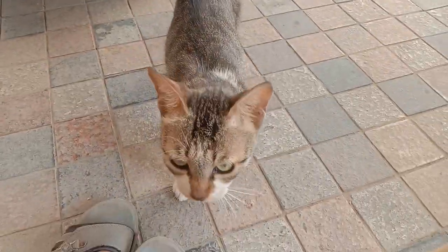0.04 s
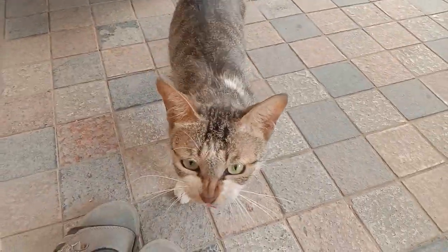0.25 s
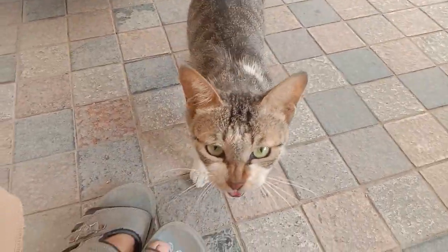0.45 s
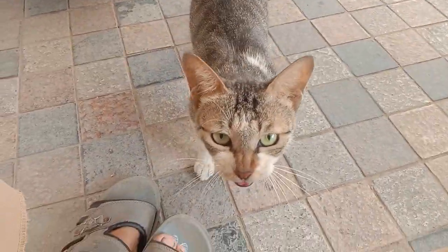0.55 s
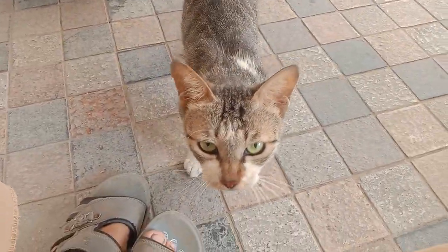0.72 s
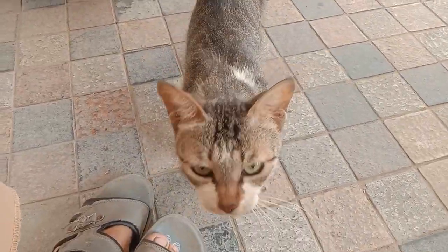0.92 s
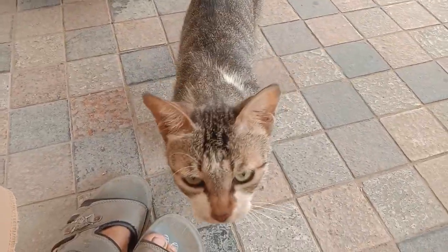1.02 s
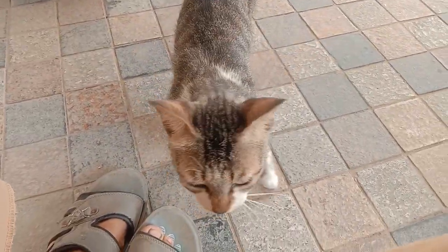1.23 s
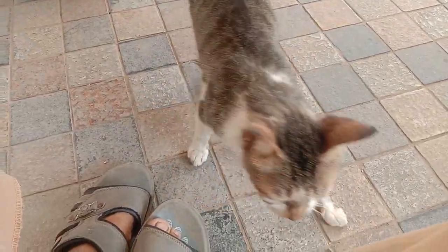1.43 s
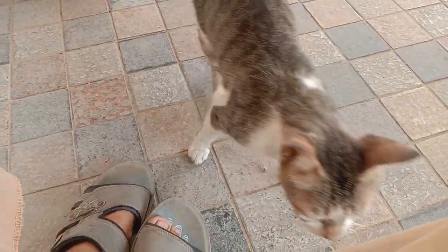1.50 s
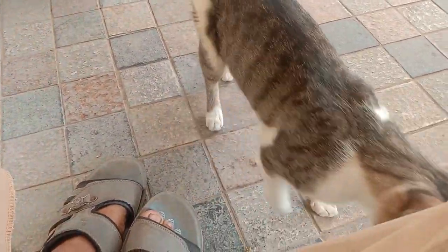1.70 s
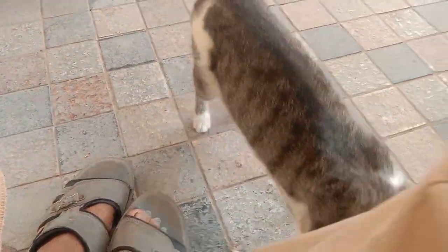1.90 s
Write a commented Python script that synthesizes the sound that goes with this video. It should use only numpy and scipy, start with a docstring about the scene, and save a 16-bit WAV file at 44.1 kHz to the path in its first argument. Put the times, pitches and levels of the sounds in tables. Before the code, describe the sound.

A cat close by gives one raspy-then-clear meow, then a door farther off creaks and bangs.

```python
"""A cat close by on a tiled courtyard gives one long meow: a raspy, period-doubled start, a clear arch,
a breathy fall. It is made of vocal fold harmonics and breath weighted by moving mouth resonances.
Then something like a door, farther off, clicks and creaks briefly (filtered noise), and bangs shut with
a rattle (noise cracks and ringing panel modes). The walls echo both by convolution with fading noise,
over a low outdoor hum of noise bands."""
import sys
import numpy as np
from scipy import signal
from scipy.fft import rfft, irfft
from scipy.io import wavfile

SR = 44100
rng = np.random.default_rng(int(sys.argv[2]) if len(sys.argv) > 2 else 0)


def store_pcm(level_fs):
    """Save levels as 16-bit WAV."""
    pcm = np.round(np.clip(level_fs, -1, 1) * 32767).astype(np.int16)
    wavfile.write(sys.argv[1], SR, np.atleast_2d(pcm).T)


N = 85995  # samples
T = np.arange(N) / SR  # time [s]
HZ = np.fft.rfftfreq(2 * N, 1 / SR)  # filter frequencies [Hz]; double length keeps the ends apart


def undb(db):
    """Amplitude of a level in dB."""
    return 10 ** (np.asarray(db) / 20)


def unit(x):
    """Scale to rms 1."""
    return x / np.sqrt(np.mean(x ** 2) + 1e-20)


def curves(table):
    """Each column of a time table, sample by sample."""
    times, *columns = np.array(table, float).T
    return [np.interp(T, times, column) for column in columns]


def gate(start, end, ramp):
    """Fade in after start, out before end [s]."""
    return np.clip(np.minimum(T - start, end - T) / ramp, 0, 1)


def shape(x, gain):
    """Filter by a gain per frequency."""
    return irfft(rfft(x, 2 * N) * gain)[:N]


def noise(colour):
    """Noise of rms 1 with a (frequency [Hz], level [dB]) spectrum, interpolated over log frequency."""
    hz, db = np.array(colour, float).T
    level_db = np.interp(np.log(HZ + 1), np.log(hz), db)
    return unit(shape(rng.standard_normal(N), undb(level_db)))


def resonance(hz, centre, half_width):
    """Gain of a resonance: 1 at its centre, one half at half_width away."""
    return 1 / (1 + ((hz - centre) / half_width) ** 2)


def wander(hz):
    """Smooth chance of rms 1, weakening above a given rate."""
    return unit(shape(rng.standard_normal(N), resonance(HZ, 0, hz)))


def turn(hz):
    """Running phase [rad] of a frequency curve."""
    return 2 * np.pi * np.cumsum(hz + np.zeros(N)) / SR


def band(hz, half_width):
    """Noise in a resonance whose centre may move."""
    phase = turn(hz)
    return wander(half_width) * np.cos(phase) + wander(half_width) * np.sin(phase)


def decay(start, t60):
    """Quick rise around the start, then an exponential fall of 60 dB per t60 [s]."""
    contact_s = 0.0048  # rise time
    age = np.maximum(T - start + contact_s / 2, 0)
    rise = np.sin(np.pi / 2 * np.minimum(age / contact_s, 1)) ** 2
    return rise * np.exp(-np.log(1000) * age / t60)


def meow(jitter_hz=260, shimmer_hz=16, breath_pulsing=0.48):
    """Vocal fold harmonics and pulsed breath in the mouth's resonances; hoarse cycles alternate."""
    # vocal fold rate: (time [s], pitch [Hz])
    fold_rate = [(.17, 345), (.2, 359.2), (.245, 405), (.285, 427), (.325, 452.6), (.355, 452.1),
                 (.42, 456.9), (.49, 460.5), (.57, 462.5), (.64, 456.5), (.7, 453.6), (.745, 426.2),
                 (.772, 407.8), (.82, 400)]
    # hoarseness: (time [s], half-pitch tones [dB], rms pitch jitter [share], breath [dB])
    rasp = [(.185, -17, 0.023, -3), (.23, -7, 0.029, -6.5), (.285, -3, .016, -9), (.32, -7, 0.013, -28),
            (.345, -24, 0.019, -11.5), (.375, -19.5, 0.0057, -22.5), (.5, -50, 0.007, -34.5),
            (.74, -48, 0.0051, -21.5), (.8, -28, 0.022, -14)]
    # the mouth opens and closes: (time [s], first, second, third, fourth resonance [Hz])
    mouth = [(.2, 1020, 1850, 3567, 5810), (.24, 1060, 1920, 3850, 5030), (.29, 1080, 1870, 3750, 5020),
             (0.337, 1120, 1880, 3820, 4800), (0.422, 1104, 1830, 3350, 4730),
             (0.491, 1077, 1780, 3830, 5220), (0.618, 1074, 1750, 3757, 5740), (.7, 1106, 1720, 3755, 5800),
             (.78, 800, 1620, 3676, 5230)]
    # strength of those resonances before the breath balance: (time [s], first, second, third, treble [dB])
    effort = [(.17, -44.5, -51.5, -63, -77), (.192, -45.5, -45.5, -39.5, -60), (.22, -36.5, -42, -39, -58),
              (.284, -33.5, -33.5, -38, -49), (.32, -33, -35, -37, -49), (.346, -30.5, -36.5, -30, -43),
              (.375, -30, -28.5, -36.5, -46), (.44, -26.5, -23.5, -35.5, -41.5),
              (.482, -26.5, -16, -37.5, -46), (.53, -26.5, -23, -37, -50), (.59, -26, -38, -36.5, -55),
              (.625, -27.5, -32.5, -37.5, -51), (.704, -28.5, -34.5, -36.5, -50),
              (.77, -32, -40, -41, -56.5), (.785, -36, -49, -42.5, -48), (.81, -51, -52, -40, -57)]
    # their half widths in the clear voice: one column [Hz]
    widths_hz = [395, 170, 366, 798]
    # how much hoarseness widens each: one column [share per unit half-pitch amplitude]
    rasp_widening = [0.79, 5.2, 2.2, 1.7]
    # faint upper resonances: (frequency [Hz], half width [Hz], level against the treble [dB])
    overtones = [(7050, 220, -14.5), (9070, 900, -31.5), (12300, 630, -37.5)]
    # fundamental before the breath balance: (time [s], level [dB])
    fundamental_level = [(.18, -55), (.33, -45.5), (.4, -48), (.47, -44), (.57, -57.5), (.68, -44),
                         (.79, -38.5), (.815, -57)]
    shimmer_db, treble_shimmer_db = 0.24, 3
    breath_tilt = 4.5  # dB per octave: the clear voice is breathier toward the treble

    pitch, = curves(fold_rate)
    half_db, jitter, breath_db = curves(rasp)
    half, air = undb(half_db), undb(breath_db)
    phase = turn(pitch * (1 + jitter * wander(jitter_hz)))

    # tones at 1.5, 2, 2.5 ... times the pitch; the half steps are the period doubling
    multiples = np.arange(3, 60)[:, None] / 2
    source = np.where(multiples % 1, half, 1)
    tones = []
    for k in multiples[:, 0]:
        tone = np.sin(k * phase + rng.uniform(0, 2 * np.pi))
        depth_db = shimmer_db if k < 10 else treble_shimmer_db
        tones.append(tone * undb(depth_db * wander(shimmer_hz)))

    efforts = curves(effort)
    throat = list(zip(curves(mouth), widths_hz, rasp_widening, efforts))
    throat += [(hz, width, 0, efforts[-1] + db) for hz, width, db in overtones]
    power, breath = 0, 0
    for centre, width, widening, db in throat:
        # each resonance shares its power among the tones near it
        passed = resonance(multiples * pitch, centre, width * (1 + widening * half)) ** 3
        weight = source ** 2 * passed
        power = power + weight / weight.sum(axis=0) * undb(db) ** 2
        tilt_db = breath_tilt * (1 - air) * np.log2(centre / 1000)
        breath = breath + undb(db + tilt_db) * band(centre, min(width, 560))

    voice = (np.sqrt(2 * power) * np.array(tones)).sum(axis=0)
    voice = voice + undb(curves(fundamental_level)[0]) * np.sqrt(2) * np.sin(phase)
    pulsed_breath = air * breath * (1 + breath_pulsing * np.cos(phase))
    return (voice + pulsed_breath) / np.sqrt(1 + air ** 2) * gate(0.151, 0.818, 0.032)


def whistle():
    """A narrow, unsteady tone of air in the throat during the hoarse start."""
    # (time [s], frequency [Hz], level [dB])
    glide = [(.2, 2365, -61), (.218, 2330, -40.5), (.245, 2290, -42), (.268, 2290, -32.5),
             (.288, 2396, -28), (.306, 2415, -43), (.335, 2400, -60.5)]
    jitter, flutter_db = 0.0071, 3.7  # rms share of the frequency, rms level
    hz, db = curves(glide)
    tone = np.sqrt(2) * np.sin(turn(hz * (1 + jitter * wander(300))))
    return tone * undb(db + flutter_db * wander(220)) * gate(glide[0][0], glide[-1][0], 0.0075)


def hiss():
    """The cat's breath runs on after the voice; one resonance sinks in it as the mouth shuts."""
    # breath: (time [s], level [dB])
    breath_level = [(0.738, -64), (0.783, -43), (.84, -44), (.91, -49.5), (.96, -58.5), (1.02, -88.5)]
    # breath colour: (frequency [Hz], relative level [dB])
    breath_colour = [(350, -29), (600, -7.5), (758, -9.5), (846, -24), (970, -31), (1230, 1), (1450, -15.5),
                     (1850, -8.5), (2150, -18.5), (2910, -13), (5560, -7), (7940, -43), (13400, -44),
                     (14900, -27), (16000, -25.5)]
    # the sinking third resonance: (time [s], frequency [Hz], level [dB])
    closing_mouth = [(.75, 3694, -56), (.782, 3500, -39), (.8, 3165, -54), (.835, 2885, -44.5),
                     (.88, 2850, -87)]
    hz, db = curves(closing_mouth)
    closing = band(hz, 80) * undb(db)
    breath = noise(breath_colour) * undb(curves(breath_level)[0])
    return (breath + closing) * gate(breath_level[0][0], breath_level[-1][0], 0.01)


def latch():
    """Short bright clicks: coloured noise that dies at once."""
    # (time [s], level [dB])
    clicks = [(1.387, -34.5), (1.391, -40)]
    # click colour: (frequency [Hz], relative level [dB])
    click_colour = [(1000, -21), (2300, -14), (3050, 3), (3450, -5), (3950, 7), (5400, -1), (6300, -15),
                    (8500, -22), (12000, -24.5), (16000, -33)]
    return sum(undb(db) * noise(click_colour) * decay(t, 0.037) for t, db in clicks)


def creak(slip_depth_db=0.5, swell_db=2):
    """Uneven stick and slip rings a few resonances, which sag as the door slows."""
    # (frequency before the sag [Hz], width [Hz], relative level [dB])
    creak_modes = [(980, 33, -14), (1518, 270, 1), (1867, 150, 5), (2360, 130, -16), (4370, 110, -10.5),
                   (5050, 700, -11.5), (6700, 130, -23.5)]
    start_s, end_s, ramp_s = 1.372, 1.615, 0.028
    start_db, slip_hz, sag = -42.5, 95.4, 0.035
    progress = np.clip((T - start_s) / (end_s - start_s), 0, 1)
    glide = 1 + sag * (0.4 - 2 * progress ** 4)
    ring = sum(undb(db) * band(hz * glide, width / 2) for hz, width, db in creak_modes)
    slip_phase = turn(slip_hz * (1 + 0.18 * wander(40)))
    slips = undb(slip_depth_db * np.cos(slip_phase))
    return unit(ring * slips) * undb(start_db + swell_db * progress) * gate(start_s, end_s, ramp_s)


def bang():
    """Bang and rattle: quick blows, each a dull crack that rings the panel's modes."""
    # (time [s], level [dB])
    blows = [(1.579, -32.5), (1.587, -20), (1.592, -22), (1.597, -24), (1.605, -22), (1.622, -28.5),
             (1.65, -27.5)]
    # crack colour: (frequency [Hz], relative level [dB])
    blow_colour = [(25, -45), (50, -24), (90, -4.5), (200, -4.5), (500, -1.5), (800, -6), (1250, 3.5),
                   (1500, -15.5), (1850, -4.5), (2500, -23), (3100, -11), (3800, -17), (5400, -15.5),
                   (7000, -25.5), (8200, -37.5), (12000, -39), (16000, -37)]
    # panel modes: (frequency [Hz], width before damping is scaled [Hz], relative level [dB])
    panel = [(227, 170, -8), (480, 100, -1.5), (785, 53, 0), (1050, 36, -5.5), (1291, 33, 3),
             (1740, 110, -7), (2880, 120, -24), (2970, 110, -15), (4040, 170, -24), (5150, 150, -32)]
    crack_t60_s, panel_db, damping = 0.12, -4.5, 0.77  # damping scales the mode widths
    out = 0
    for t, db in blows:
        ring = 0
        for hz, width, mode_db in panel:
            tone = np.sin(2 * np.pi * hz * (T - t) + rng.uniform(0, 2 * np.pi))
            mode_t60_s = np.log(1000) / (np.pi * width * damping)  # wide modes die sooner
            ring = ring + undb(mode_db) * tone * decay(t, mode_t60_s)
        crack = noise(blow_colour) * decay(t, crack_t60_s)
        out = out + undb(db) * (crack + undb(panel_db) * ring)
    return out


def courtyard(x):
    """Diffuse echo of walls and tiles; the bass escapes sooner."""
    # echo colour: (frequency [Hz], relative level [dB])
    yard_colour = [(60, 7), (200, 12), (600, -7), (1250, 7), (2000, 4.5), (5000, 5.5), (8000, -0.5),
                   (15000, -7)]
    lag_s, t60_s, bass_t60_s, crossover_hz = 0.016, 0.67, 0.37, 380
    wash = noise(yard_colour)
    bass = shape(wash, resonance(HZ, 0, crossover_hz) ** 2)
    tail = (wash - bass) * decay(lag_s, t60_s) + bass * decay(lag_s, bass_t60_s)
    return signal.fftconvolve(x, tail / np.sqrt(np.sum(tail ** 2)))[:N]


def background():
    """Low outdoor noise with wavering hums, each a narrow band of noise."""
    # outdoor noise colour: (frequency [Hz], relative level [dB])
    air_colour = [(15, -87), (25, -30.5), (70, -21.5), (108, -5), (256, -10), (317, -3.5), (560, -19.5),
                  (659, -19), (1100, -24.5), (1290, -24.5), (1400, -19), (2760, -30.5), (3620, -25.5),
                  (4250, -31), (6050, -37), (7920, -62.5), (16000, -51.5)]
    # wavering hums: (frequency [Hz], width [Hz], level [dB])
    hums = [(305.8, 12, -60), (1273, 51, -60.5)]
    # swell of the low hum: (time [s], relative level [dB])
    hum_swell = [(0, -7.5), (.6, 3.5), (.85, 5), (1.15, -4), (1.35, 10), (1.52, 4.5), (1.9, -6)]
    low_hum = undb(-60.5 + curves(hum_swell)[0]) * band(106.8, 38)  # centre, half width [Hz]
    air = undb(-50.5) * noise(air_colour) * undb(0.5 * wander(1.4))
    return air + low_hum + sum(undb(db) * band(hz, width / 2) for hz, width, db in hums)


def scene():
    """Cat near, door farther off and so more echoed, both within the walls."""
    cat = meow() + whistle() + hiss()
    door = latch() + creak() + bang()
    echo = courtyard(undb(-20) * cat + undb(-9) * door)
    return (cat + door + echo + background())[None]


def record(dry):
    """The recorder thins the deep bass below 55 Hz and cuts the top above 15.8 kHz."""
    thinned = signal.sosfilt(signal.butter(2, 55, "high", fs=SR, output="sos"), dry)
    return signal.sosfilt(signal.ellip(10, 0.2, 70, 15800, fs=SR, output="sos"), thinned)


dry = scene()
out = record(dry)
store_pcm(out)
```